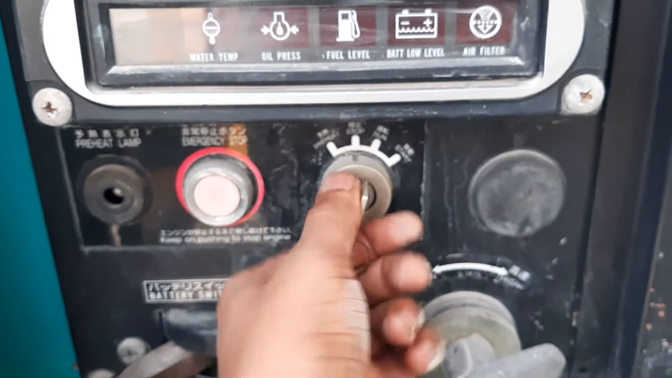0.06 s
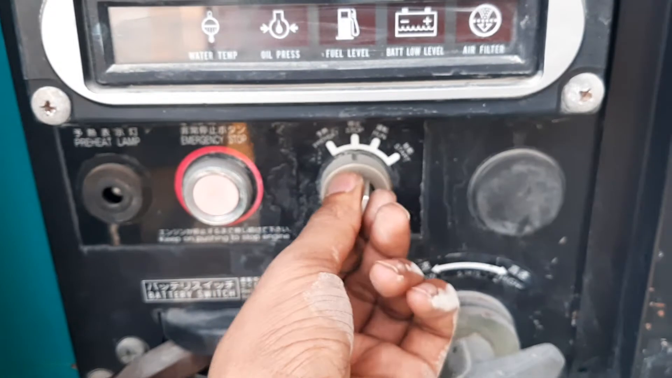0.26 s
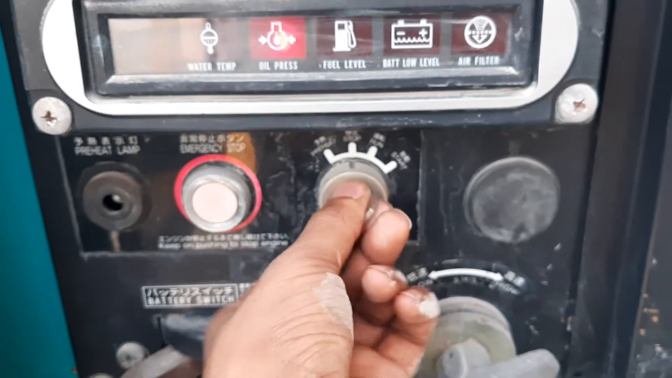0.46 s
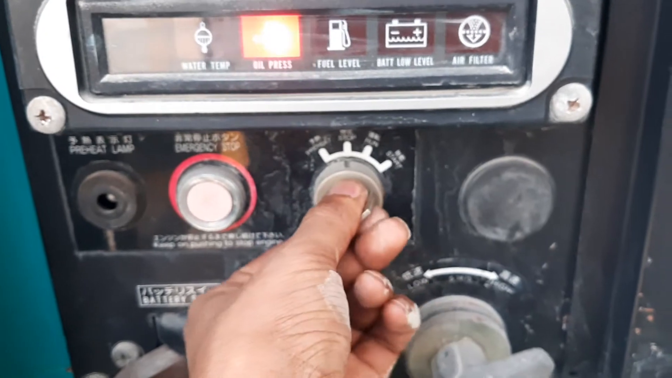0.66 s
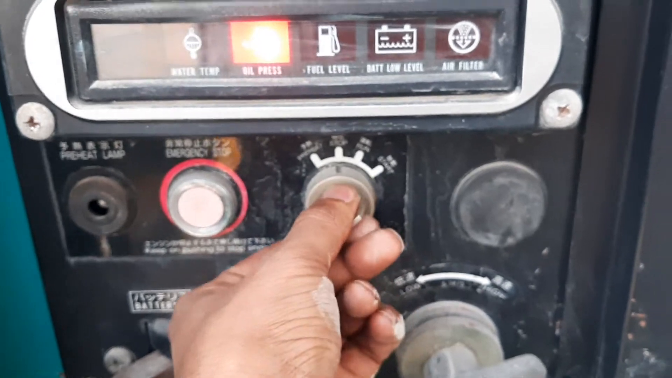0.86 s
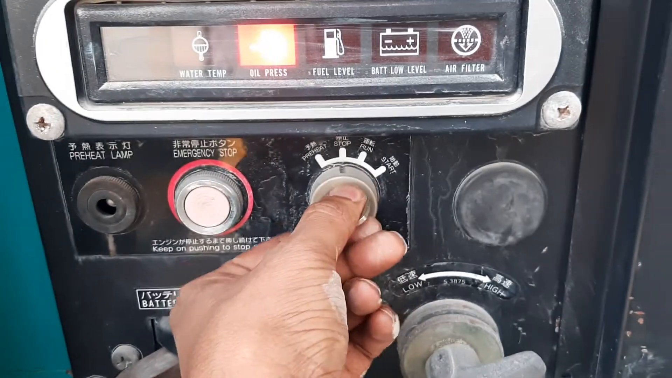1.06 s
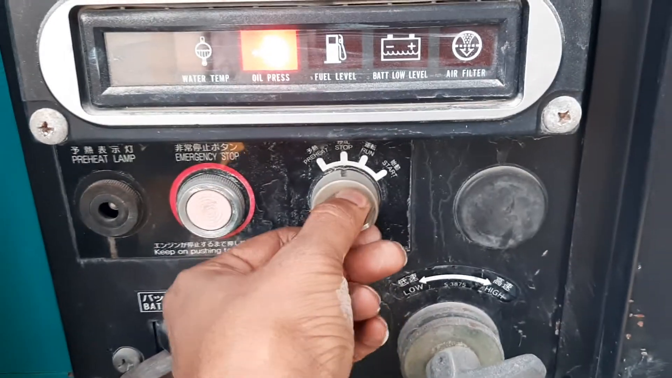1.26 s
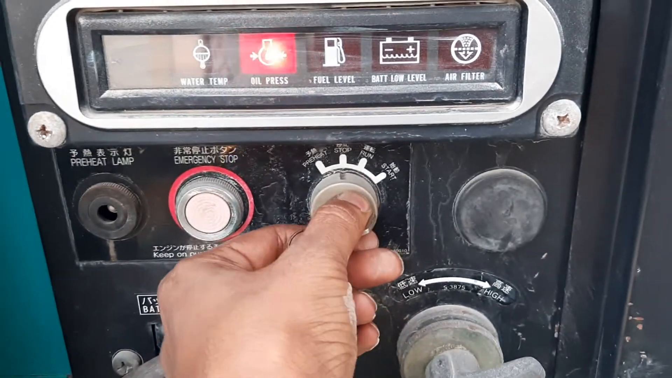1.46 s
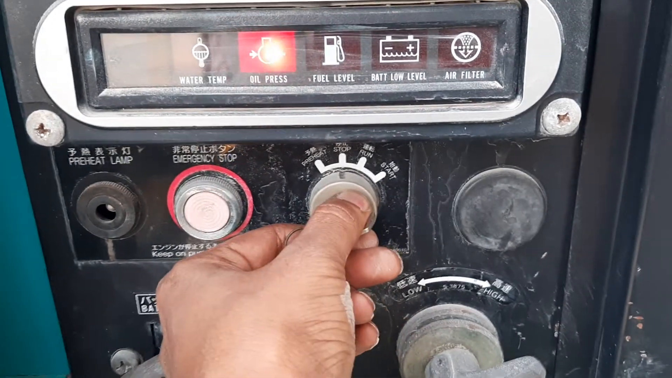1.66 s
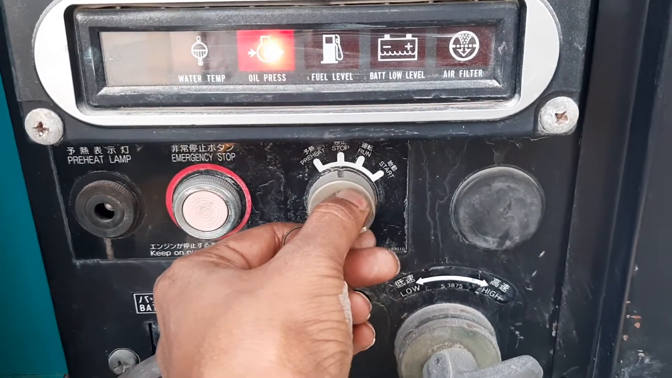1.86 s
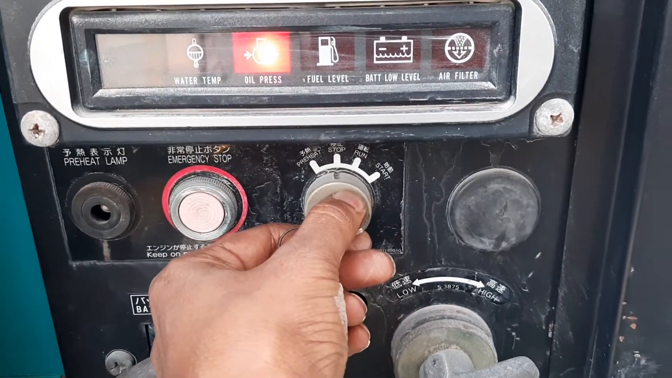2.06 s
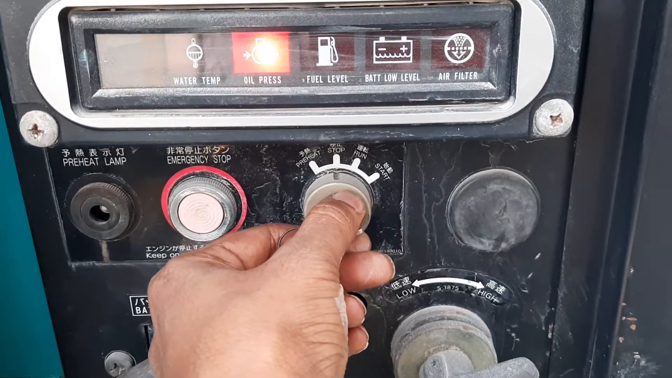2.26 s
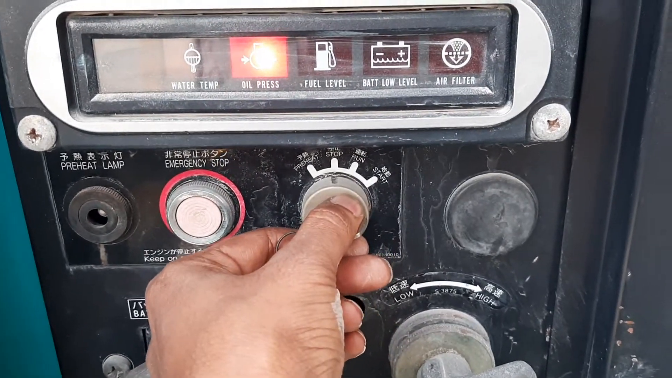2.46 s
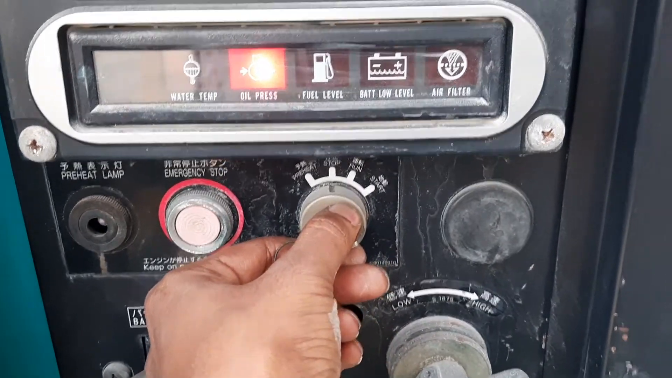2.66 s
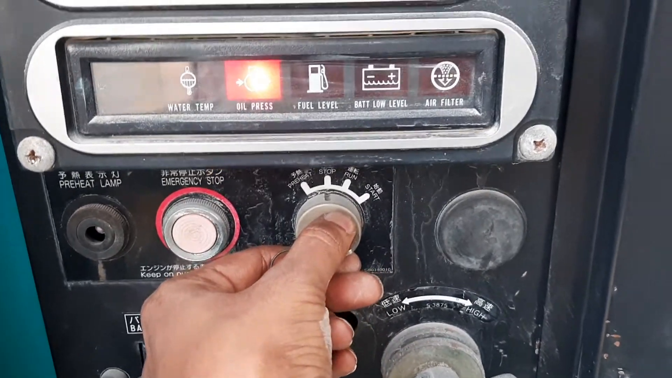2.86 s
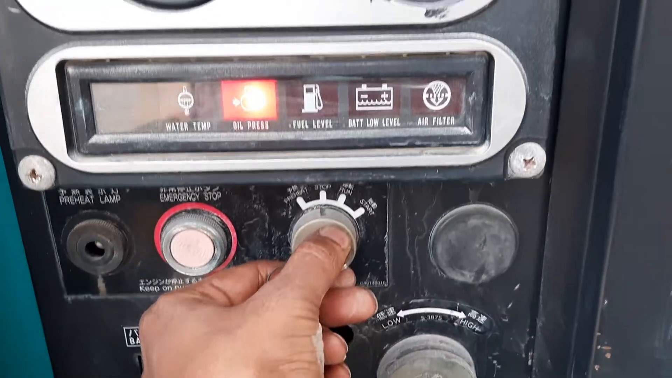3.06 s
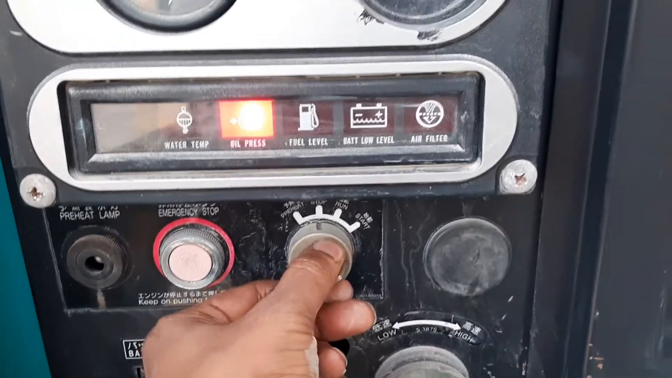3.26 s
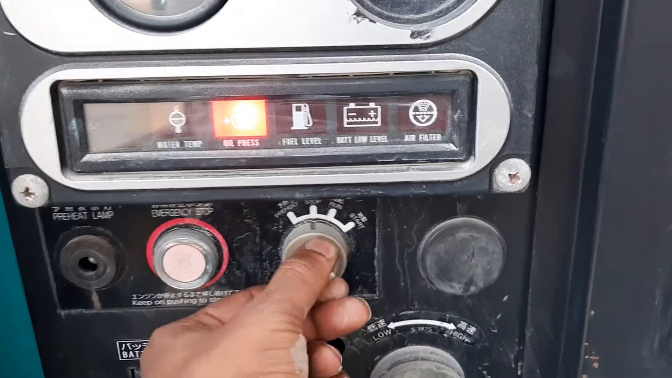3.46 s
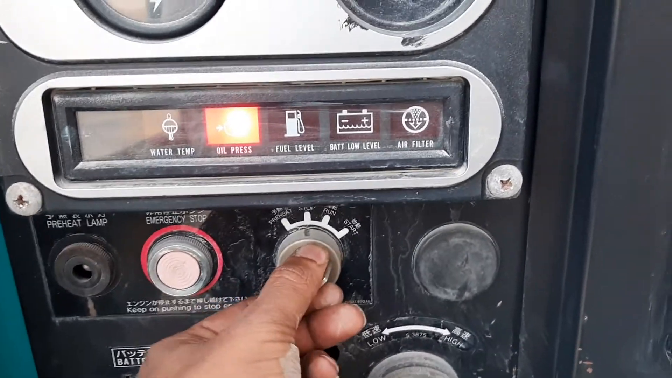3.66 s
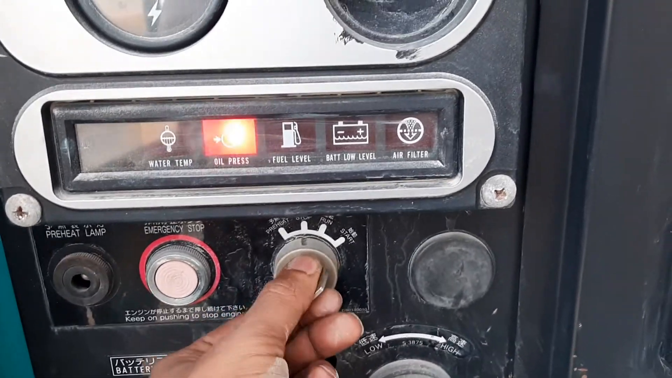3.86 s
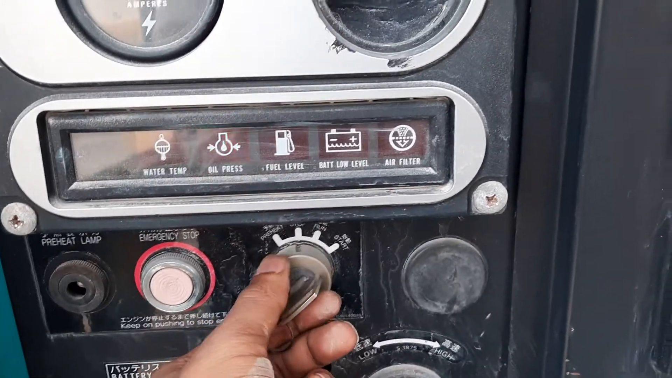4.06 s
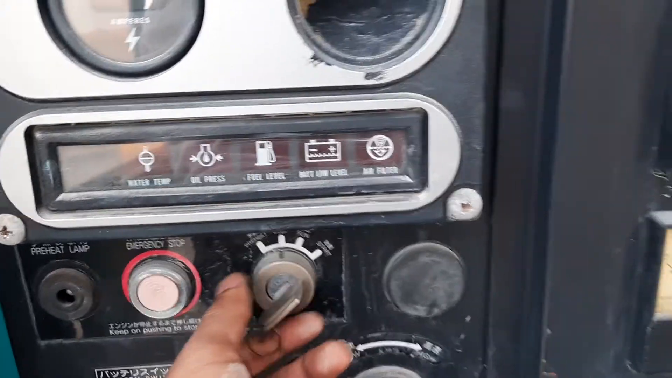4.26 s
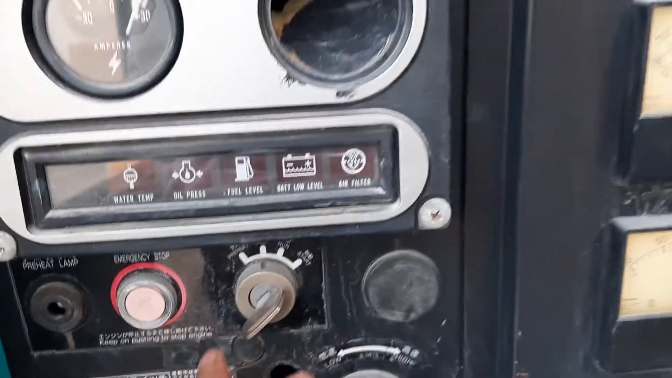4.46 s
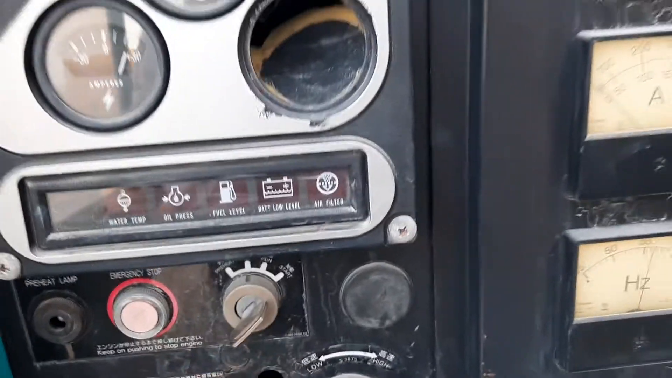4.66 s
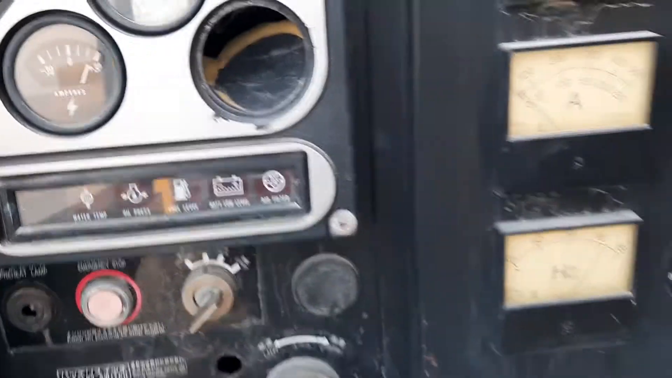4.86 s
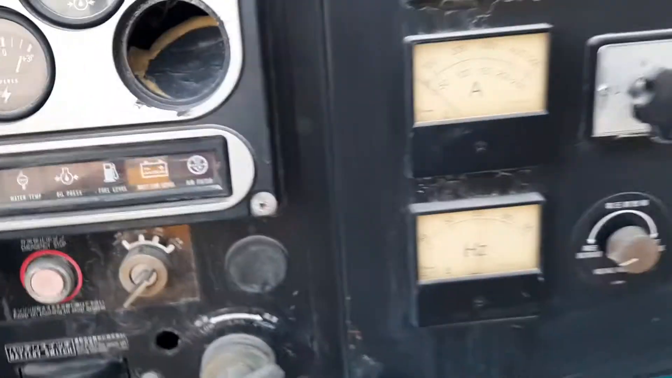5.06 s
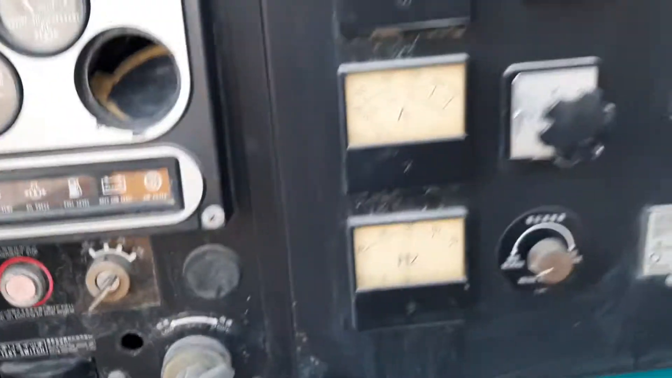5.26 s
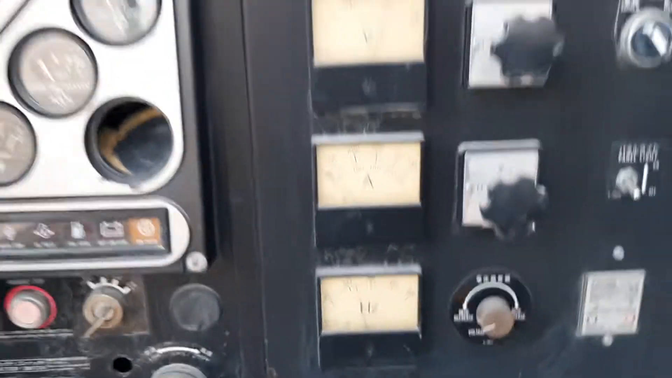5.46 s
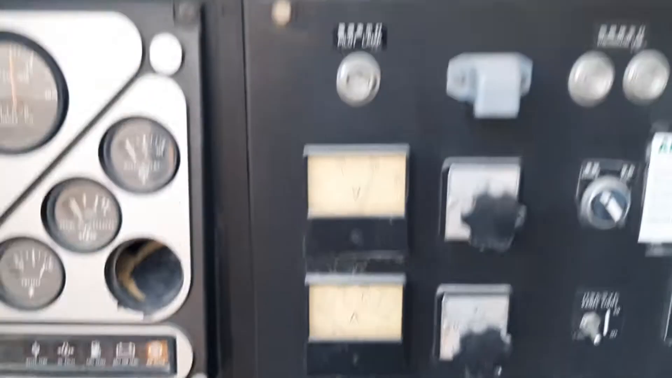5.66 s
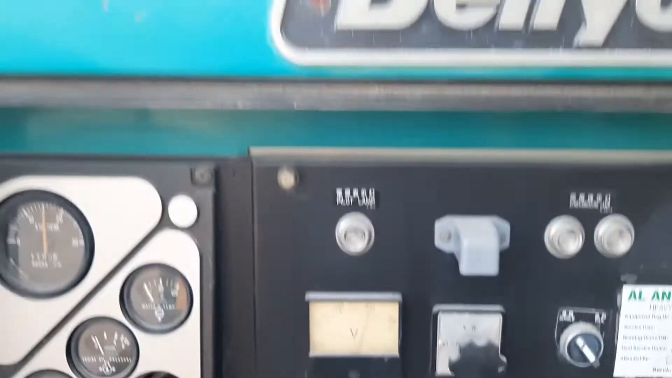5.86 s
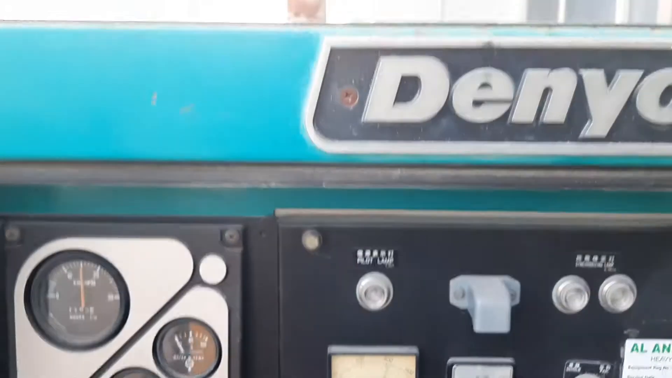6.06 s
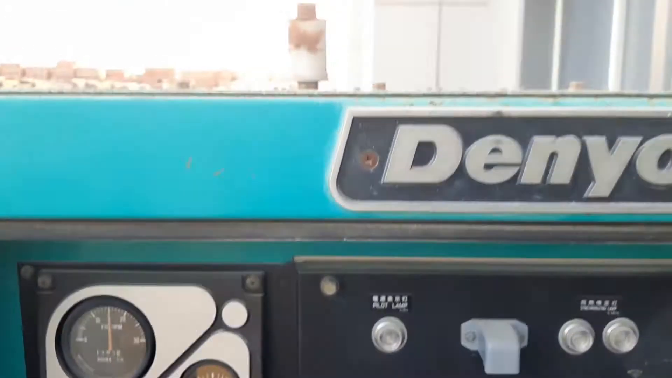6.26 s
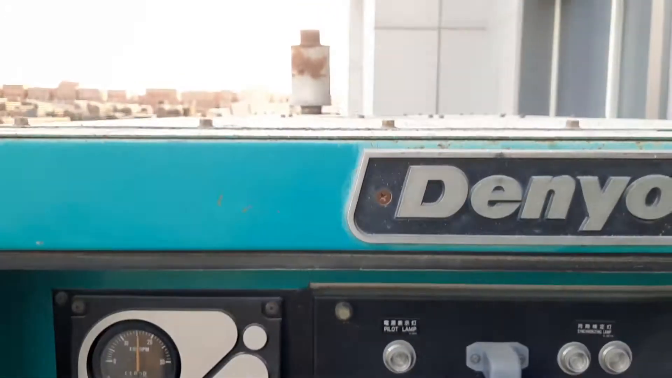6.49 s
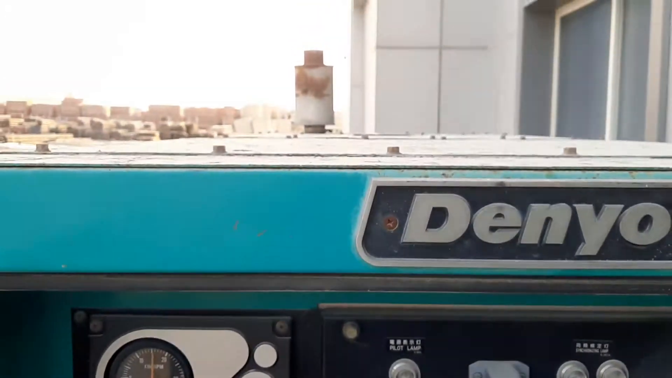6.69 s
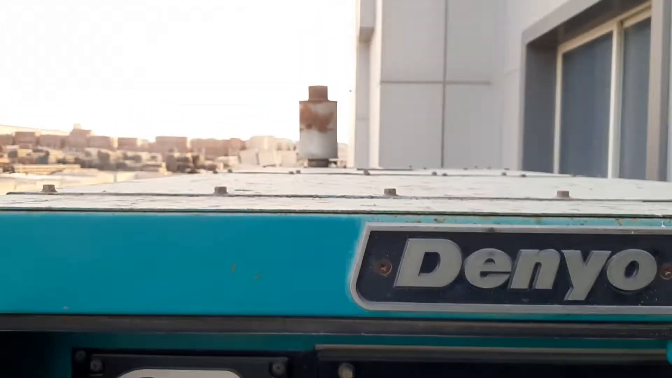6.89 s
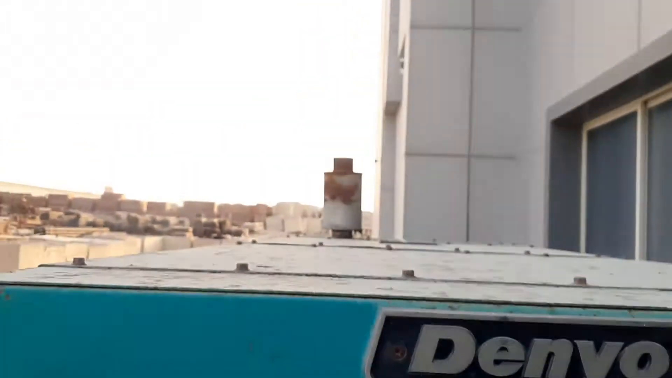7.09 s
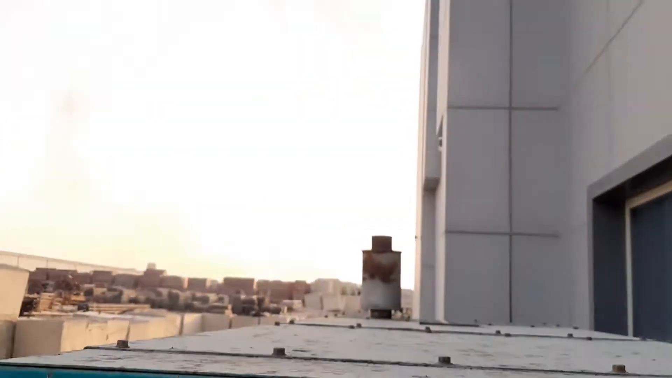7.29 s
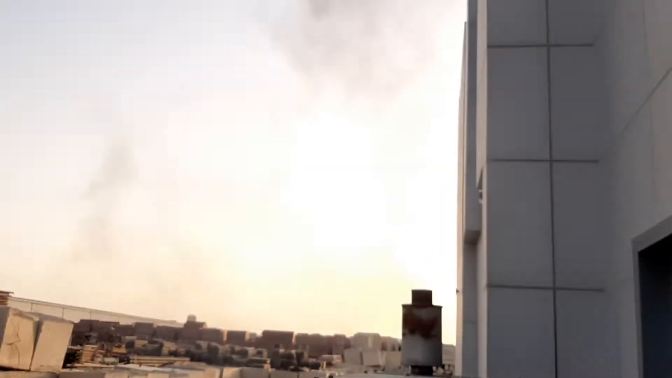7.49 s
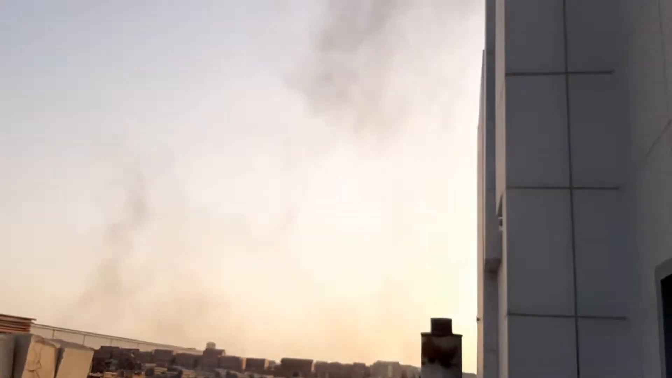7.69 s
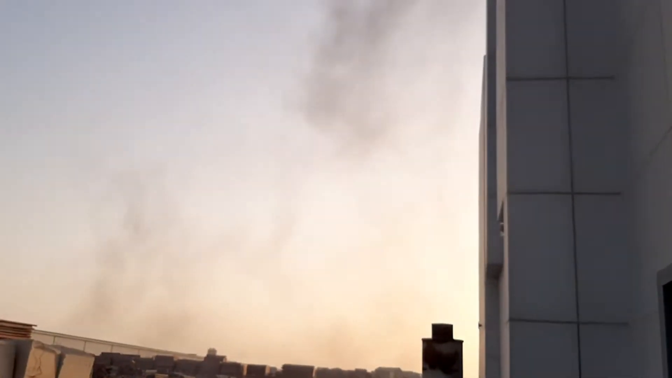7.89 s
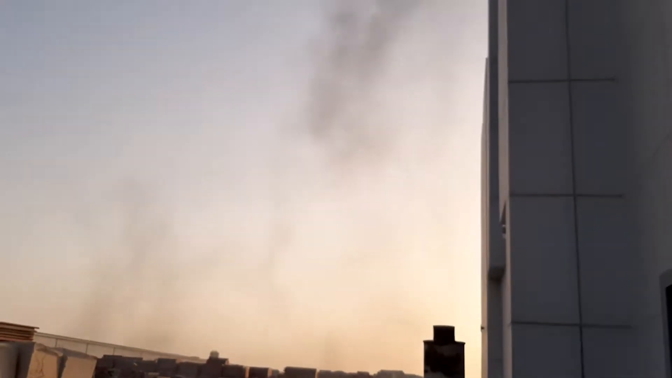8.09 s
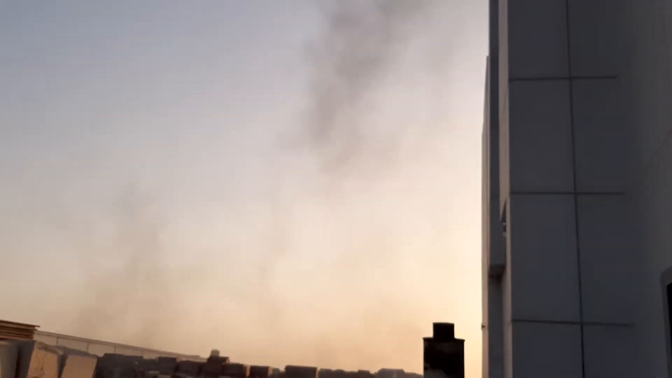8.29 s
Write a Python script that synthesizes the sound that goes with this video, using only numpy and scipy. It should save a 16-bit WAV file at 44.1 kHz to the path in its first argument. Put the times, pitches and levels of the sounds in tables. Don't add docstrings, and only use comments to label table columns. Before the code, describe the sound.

A quiet open yard murmurs under faint microphone hiss. Light touches on a key at 0.1 and 0.2 s lead to a scrape and quick clicks around 0.5 s, with a sharp snap and dull relay thud at 0.54. A soft stir of air fades. At about 1.45 s the starter slams in with hard metallic blows and a low jolt, then whines roughly around 750 to 870 Hz, surging higher near 1.95 and 2.12 s, with short squeals. The diesel catches unevenly; from 2.4, and thickest at 2.7 to 3.0 s, loose panels rattle brightly. From 3.1 to 4.2 s it climbs, clatter hardening and exhaust booming, then holds steady with a deep hum, fan drone, hiss and sparse trim ticks. From 4.5 to 5.6 s the microphone rises over the roof: panel fan and boom ease, exhaust tone and a loose tappet emerge, continuing steadily to the end at about 8.4 s.

```python
import sys
import numpy as np
from scipy import signal
from scipy.fft import rfft, irfft, next_fast_len
from scipy.io import wavfile
from scipy.ndimage import uniform_filter1d

SR = 44100
rng = np.random.default_rng(int(sys.argv[2]) if len(sys.argv) > 2 else 0)


def to_wav(sig):
    pcm = np.clip(np.atleast_2d(sig), -1, 1) * 32767
    pcm = np.round(pcm).astype(np.int16)
    wavfile.write(sys.argv[1], SR, pcm.T)


def ratio(d):
    e = np.asarray(d, float) / 20
    return 10 ** e


N = 367353
T = np.arange(N) / SR
HZ = np.fft.rfftfreq(next_fast_len(N), 1 / SR)


def evened(x):
    return x / np.sqrt(np.mean(x ** 2) + 1e-20)


def read(points):
    hz, value = np.transpose(points)
    return np.interp(np.log(HZ + 1), np.log(hz + 1), value)


def shaped(x, gain):
    size = next_fast_len(N)
    return irfft(rfft(x, size) * gain, size)[..., :N]


def noise(colour):
    return evened(shaped(rng.standard_normal((2, N)), ratio(read(colour))))


def level(rows, before_db=-120):
    return ratio(np.interp(T, *np.transpose(rows), left=before_db))


def wobble(rate_hz, size=N):
    steps = 2 * (size // 64 + 2)
    hz = np.fft.rfftfreq(steps, 32 / SR)
    slow = irfft(rfft(rng.standard_normal(steps)) / (1 + (hz / rate_hz) ** 4))
    return np.interp(np.arange(size) / 32, np.arange(steps), evened(slow))


def bursts(rows):
    power = np.zeros(N + SR)
    u = T[:SR // 2]
    rise = np.minimum(u / 0.0021, 1)
    for start_s, db, t60 in rows:
        power[round(start_s * SR):][:len(u)] += ratio(db - 60 * u / t60) ** 2 * rise
    return np.sqrt(power[:N])


def held(rows):
    t = T[::32]
    power = 0
    for start, end, db, rise, fall in rows:
        outside = np.maximum((start - t) / rise, (t - end) / fall)
        power = power + ratio(db - 60 * np.maximum(outside, 0)) ** 2
    return np.interp(T, t, np.sqrt(power))


def fuzzy(turn, blur_hz, depth_db, slip_rad):
    size = len(turn)
    sides = []
    for _ in "LR":
        swell = ratio(depth_db * wobble(blur_hz, size))
        sides.append(swell * np.sin(turn + slip_rad * wobble(blur_hz, size)))
    return np.array(sides)


def struck_modes(start_s, db, modes, rise_s=1e-4):
    u = T[:SR // 2]
    ring = sum(ratio(db + d - 60 * u / t60) * np.sin(2 * np.pi * hz * u) for hz, d, t60 in modes)
    return np.pad(ring * np.minimum(u / rise_s, 1), (round(start_s * SR), N))[:N]


# pitch_hz, level_db (per Hz)
YARD_COLOUR = [(18, -32), (30, -5), (79, -5.5), (115, -4.5), (175, -1), (253, -12.5), (603, -26),
               (670, -26.5), (895, -29.5), (1600, -34.5), (2780, -55.5), (9570, -67), (15000, -56.5),
               (16200, -61)]
# start_s, end_s, level_db, rise_s, fall_s
YARD_SWELLS = [
    (0.059, 1.43, -46, .1, .1),
    (0.0, .04, -44.5, .1, .3),
    (0.59, 0.61, -28.5, 0.27, 0.56),
    (0.56, 1.02, -45.5, 2, .3),
]
# pitch_hz, level_db (per Hz)
MICROPHONE_HISS = [(7000, -29), (10000, -14), (12500, -2), (15500, 0), (16300, -24.5)]


def yard():
    murmur = noise(YARD_COLOUR) * held(YARD_SWELLS) * ratio(1.2 * wobble(8.2))
    return murmur + ratio(-81) * noise(MICROPHONE_HISS)


# start_s, end_s, level_db, rise_s, fall_s
SCRAPES = [
    (.48, .648, -44.5, .012, 0.034),
    (.558, .564, -27.5, 0.12, 0.15),
    (.65, .66, -61.5, .05, .3),
]
# time_s, peak_db, t60_s, top_db (the thin top above 8 kHz)
KEY_CLICKS = [
    (0.0981, -49, 0.1, -21),
    (0.1879, -57.5, 0.16, -27),
    (0.476, -38, 0.1, -30),
    (0.4913, -38.5, .1, 2),
    (0.5027, -29, 0.1, 5.5),
    (0.5193, -22.5, 0.11, 6),
    (0.5387, -10.5, 0.081, -17),
    (.56, -26.5, .2, -3.5),
    (0.5994, -33, 0.1, -13.5),
]
# pitch_hz, level_db (per Hz)
BARREL_COLOUR = [(240, -35.5), (400, -8), (432, -8.5), (554, -16), (721, -3.5), (967, -16), (1520, -9.5),
                 (2300, -11.5), (2530, -12.5), (4340, -13), (7400, -18), (9000, -28), (11800, -23),
                 (13900, -29), (16200, -33)]
# pitch_hz, level_db (per Hz)
CLICK_TOP_COLOUR = [(3530, -39), (6000, -8), (8530, -22), (9240, -14), (9970, -24), (10400, -12),
                    (13900, -2), (16500, -22)]
# pitch_hz, level_db, t60_s
RELAY_THUD = (.541, -20.5, [(163.5, -3.5, 0.3), (197, -2.5, 0.17), (434, -21, .3), (657, -8, .19),
              (1620, -25, 0.35), (2430, -28, .16)])


def key():
    scrape = held(SCRAPES) * ratio(-1.5 + 1.5 * wobble(150))
    clicks = bursts([(s, db - 13.0, t60) for s, db, t60, _ in KEY_CLICKS])
    tops = bursts([(s, db + top_db - 7.0, 0.43 * t60) for s, db, t60, top_db in KEY_CLICKS])
    rasp = noise(BARREL_COLOUR) * np.hypot(scrape, clicks) + noise(CLICK_TOP_COLOUR) * tops
    thud = struck_modes(*RELAY_THUD) * ratio(2.5 * wobble(40))
    return rasp, thud


# time_s, peak_db, body_db (against treble), t60_s, top_db (against treble)
PANEL_BLOWS = [(1.4407, -12.5, 1.5, 0.38, 1), (1.4736, -8, -1.5, 0.15, -3), (1.496, -15.5, 1, 0.18, 1),
               (1.6258, -24.5, 10, 0.15, -0.5), (1.662, -15, 1, 0.2, -2.5), (1.9343, -26, 6, 0.15, 0),
               (2.1137, -24, -3, 0.1407, 0.5), (2.349, -22.5, 0.5, 0.13, -4),
               (2.4013, -13.5, -11, 0.095, 0.5), (2.45, -25, -3, .1, -4), (2.49, -24, 6, .1, -5),
               (2.5748, -19, -3, 0.1, -0.5), (2.672, -23, -3, .1, -3), (2.702, -9, -6, 0.094, 0.5),
               (2.7329, -11, -6.5, 0.1, -1.5), (2.745, -17.5, -6, .1, -4), (2.766, -9, -10.5, 0.1, -1),
               (2.775, -12, -8, .1, -3), (2.794, -13, -20, 0.082, 1.5), (2.8105, -13.5, -13, 0.14, -1),
               (2.833, -19, -3, .1, -3), (2.839, -11, -4.5, 0.12, 4), (2.855, -15.5, -8, .08, 0),
               (2.865, -8.5, -10, 0.12, -2.5), (2.884, -14.5, -6, .1, -2), (2.9088, -8, -8, 0.1, -4.5),
               (2.924, -9.5, -9, .12, -5), (2.957, -18, -6, .1, -2.5), (2.974, -8.5, -5, 0.06, -7),
               (3.1, -24.5, 6, .1, 0), (3.1363, -24.5, 5, 0.15, -4), (3.3069, -23, -5, 0.12, 1),
               (3.3498, -20.5, -10, 0.11, 0)]
# pitch_hz, level_db (per Hz)
SPRAY_COLOUR = [(1470, -9.5), (2500, -10), (3160, -1), (5640, -1), (7710, -3), (8080, -44), (8730, -16.5),
                (11700, -9.5), (13700, -11.5), (14900, -12), (16200, -37.5)]
# pitch_hz, width_hz, level_db
SHEET_METAL = [(830, 170, 7), (1940, 510, 6.5), (1520, 200, -16)]
# time_s, peak_db
TRIM_TICKS = [(3.4871, -40), (3.5395, -34.5), (3.6448, -36.5), (3.8982, -34), (4.0159, -32.5),
              (4.1801, -35), (4.2414, -38), (4.3133, -37), (4.5397, -36), (4.7308, -37), (4.875, -34.5),
              (5.3304, -36.5), (5.6597, -37.5), (5.9311, -38), (6.1386, -40), (6.5277, -38.5),
              (6.8455, -38), (7.0485, -39.5), (7.3693, -39), (7.6896, -41)]


def rattles():
    ring = sum(ratio(db) / (1 + (2 * (HZ - hz) / width) ** 2) for hz, width, db in SHEET_METAL)
    crackle = evened(ratio(1.6 * wobble(350)))
    spray = noise(SPRAY_COLOUR) * crackle
    top = shaped(spray, HZ > 7900)
    low = (spray - top) * bursts([(s, db - 9.5, t60) for s, db, _, t60, _ in PANEL_BLOWS])
    high = top * bursts([(s, db + up - 2.0, 0.5 * t60) for s, db, _, t60, up in PANEL_BLOWS])
    ticks = evened(top) * bursts([(s, db - 5, 0.1) for s, db in TRIM_TICKS])
    body = bursts([(s, db + body_db - 3.5, 0.53 * t60) for s, db, body_db, t60, _ in PANEL_BLOWS])
    return low + high + ticks + evened(shaped(rng.standard_normal((2, N)), ring)) * body


# start_s, end_s, pitch_hz,
# glide_hz_per_s, level_db
SQUEALS_AND_RINGS = [(1.655, 1.75, 12000, 0, -47), (1.76, 1.88, 12000, 0, -53), (3.52, 4.25, 13350, 0, -60),
                     (3.15, 3.7, 12000, 0, -59), (3.45, 3.7, 5100, 0, -53), (1.62, 1.88, 15000, 0, -55),
                     (2.88, 3.05, 15000, 0, -47), (2.9, 2.97, 11800, 0, -51), (3.4, 3.7, 4100, 0, -55),
                     (.6, 1.44, 1550, 0, -73), (.095, .12, 1650, 0, -61), (.18, .205, 1550, 0, -60),
                     (.62, .86, 5800, 0, -83), (.62, .82, 4300, 0, -86), (.16, .4, 4850, 0, -91),
                     (.477, .498, 1550, 0, -41.5), (.5, .514, 13600, 0, -43), (.518, .536, 14000, 0, -33),
               (.52, .534, 2400, 0, -39), (0.598, .67, 1560, 0, -49.5), (.59, .66, 2150, 0, -51.5),
               (.545, .62, 5600, 0, -53), (.545, .6, 3300, 0, -49), (1.564, 1.6, 1500, 2, -21),
               (1.651, 1.93, 727, 0, -25), (1.823, 1.9, 2170, 0, -32), (1.81, 1.895, 430, 0, -30),
               (1.59, 1.63, 1120, 0, -30), (1.935, 2.034, 630, 0, -31), (1.935, 2.02, 1525, -1, -27.5),
               (1.94, 2.03, 4580, -1500, -34), (1.95, 2.03, 4240, -1500, -32.5),
               (2.12, 2.153, 4400, 0, -40), (1.468, 1.496, 5600, -2, -25.5), (1.47, 1.495, 4400, 0, -26.5),
               (2.118, 2.148, 710, 0, -29), (1.6, 1.665, 1300, 0, -24), (1.625, 1.69, 2050, 0, -31.5),
               (1.7, 1.82, 4300, 0, -40), (2.04, 2.125, 3050, 5500, -39), (2.16, 2.265, 3600, 3800, -39),
               (2.175, 2.3, 1545, 300, -31), (2.258, 2.29, 2000, 0, -39), (3.16, 3.25, 4150, 0, -38),
               (3.23, 3.31, 4100, 0, -43), (3.05, 3.12, 4150, 0, -45), (2.972, 2.986, 5800, 0, -29),
               (1.69, 1.78, 2400, 0, -34), (1.98, 2.03, 1100, -1500, -26)]


def squeals():
    out = np.zeros((2, N))
    for start, end, hz, glide, db in SQUEALS_AND_RINGS:
        u = T[:round((end - start) * SR)]
        edge = np.sqrt(abs(np.sin(np.pi * (u / u[-1]) ** .7)))
        turn = 2 * np.pi * (hz * u + glide * u ** 2 / 2)
        out[:, round(start * SR):][:, :len(u)] += ratio(db) * edge * fuzzy(turn, 45, 4, 1.2)
    return out


# time_s, pitch_hz
TOOTH_SURGES = [
    [(1.53, 752.3), (1.58, 782), (1.62, 699.3), (1.69, 795.2), (1.745, 867.7), (1.79, 860.3),
     (1.825, 763.5), (1.93, 748)],
    [(1.932, 1199), (1.98, 1074), (2.01, 1003), (2.07, 977)],
    [(2.112, 1482), (2.126, 1277), (2.138, 1258), (2.148, 1353), (2.185, 1364)],
]
# start_s, end_s, level_db, upper_db (extra for high partials)
TOOTH_BITES = [
    (1.548, 1.59, -40, 9),
    (1.594, 1.66, -36, 6),
    (1.678, 1.783, -25.5, 2),
    (1.789, 1.871, -24.5, 3),
    (1.94, 2.015, -22.5, -3),
    (2.12, 2.135, -20, -6),
    (2.15, 2.155, -28, -31),
]
# multiple, level_db, slip_rad
WHINE_PARTIALS = [(.6, -16, 1.2), (.84, -12, 1.4), (.5, -13, .6), (1, 1, .65), (1.2, -17, 1.5),
                  (1.45, -13, 1.3), (1.7, -13, 1.5), (1.9, -11, 1.2), (2, 1, .6), (2.3, -12, 1),
                  (2.6, -13, 1), (3, -8.5, .55), (3.5, -17, 1), (4, -15, 1.1), (5, -16, 1.2)]


def starter():
    rise_s, fall_s, upper_fall_s = 0.087, 0.2, 0.12
    out = np.zeros((2, N))
    span = slice(round(TOOTH_SURGES[0][0][0] * SR), round(TOOTH_SURGES[-1][-1][0] * SR))
    t = T[span]
    hz = np.interp(t, *np.vstack(TOOTH_SURGES).T)
    low = held([(a, b, db, rise_s, fall_s) for a, b, db, _ in TOOTH_BITES])[span]
    upper = held([(a, b, db + up, rise_s, upper_fall_s) for a, b, db, up in TOOTH_BITES])[span]
    edge = 0
    for rows in TOOTH_SURGES:
        edge = edge + np.clip(np.minimum(t - rows[0][0], rows[-1][0] - t) / .008, 0, 1)
    turn = 2 * np.pi * np.cumsum(hz) / SR
    for k, order_db, slip in WHINE_PARTIALS:
        flutter = fuzzy(k * turn, 45 + 15 * k, 2.6, 1.15 * slip)
        out[:, span] += ratio(order_db) * (upper if k > 1.7 else low) * edge * flutter
    out[:, span] *= ratio(3.5 * np.sin(2 * np.pi * 46.9 * t + 1.53 * wobble(12, len(t))))
    return out


# time_s, firings_hz
ENGINE_SPEED = [(1.44, 6), (2.2, 20), (2.48, 33.5), (2.8, 41), (3.09, 34.5), (3.4, 45.9), (3.7, 58.3),
                (4, 69.9), (4.2, 75.9), (4.45, 75.13), (4.85, 75), (5.65, 75.01), (6.45, 75.1),
                (8.4, 75.17)]


def crank():
    firing = np.interp(T, *np.transpose(ENGINE_SPEED), left=1e-3)
    return firing, np.cumsum(firing) / SR / 6


# time_s, share (0-1)
PHONE_RAISED = [
    (4.5, 0),
    (5.6, 1),
]


def raised():
    return np.clip(np.interp(T, *np.transpose(PHONE_RAISED)), 0, 1)


# start_s, end_s, clatter_db, brightness_db
FRAME_STRAINS = [(1.454, 1.477, -32.5, 10.5), (1.491, 1.576, -19, -16.5), (1.577, 1.635, -21.5, -7.5),
                 (1.633, 1.827, -21, -5.5), (1.946, 1.998, -24.5, -2.5), (2.12, 2.127, -24, -3),
                 (2.403, 2.408, -26.5, -5), (2.445, 2.52, -34.5, 1), (2.574, 2.58, -31.5, 3),
                 (2.624, 2.7, -34, 4), (2.702, 2.942, -23, -1.5), (2.954, 3.106, -29.5, 1.5),
                 (3.357, 3.36, -28, -19)]
# start_s, end_s, level_db, ramp_s
FULL_FUEL = (3.41, 4.05, 3.44, 0.26)
# start_s, end_s, hiss_db, rise_s, fall_s
GEAR_IN_MESH = (1, 3.5, -33, 2.5, 6)


def efforts(firing):
    rise_s, fall_s, fizz_fall_s = 0.034, 0.31, 0.38
    speed_db = 20 * np.log10(np.maximum(firing, 1e-3) / 75)
    turning = T > ENGINE_SPEED[0][0]
    start, end, pull_db, ramp = FULL_FUEL
    pull = np.clip(np.minimum(T - start, end - T) / ramp + 1, 0, 1)
    strain = held([(a, b, db, rise_s, fall_s) for a, b, db, _ in FRAME_STRAINS])
    bright = held([(a, b, db + up, rise_s, fall_s) for a, b, db, up in FRAME_STRAINS])
    thin = held([(a, b, db + up - 10.5, rise_s, fizz_fall_s) for a, b, db, up in FRAME_STRAINS])
    clatter = np.hypot(strain, ratio(-24.5 + 0.65 * speed_db + pull_db * pull)) * turning
    hiss = np.sqrt(bright ** 2 + held([GEAR_IN_MESH]) ** 2 + ratio(-40) ** 2) * turning
    air_db = -44 - np.maximum(2.5 * (3.7 - T), 2 * (T - 3.7))
    fizz = np.hypot(thin, ratio(air_db)) * turning
    fan = ratio(3.3 * np.minimum(speed_db, 0))
    return clatter, hiss, fizz, fan


# multiple, level_db
FAN_TONES = [(1, 0), (2, -11), (3, -11.5), (4, -17), (5, -24), (9, -23)]
# start_s, end_s, level_db, rise_s, fall_s
FAN_SWELL = (3.92, 4.18, 1, .5, 2.2)


def cooling_fan(cycles, effort, far):
    blades = 6 * 1.7215 * 2 * np.pi * cycles
    base = np.hypot(effort * ratio(2.5 * (1 - far)), held([FAN_SWELL]))
    upper = effort ** .4
    out = 0
    for k, db in FAN_TONES:
        tone = np.sin(k * (blades + .12 * wobble(5)))
        out = out + (base if k == 1 else upper) * ratio(db + 1.3 * wobble(6)) * tone
    return out * ratio(-23.5)


# multiple, level_db
CYCLE_TONES = [(5, -23), (9, -12), (10, -14), (11, -23), (13, -18), (14, -14), (15, -16), (18, -17),
               (21, -16), (24, -7), (27, -19), (33, -21)]
# pitch_hz, width_hz, level_db
CABINET_AIR = (133, 20, 13)
# start_s, end_s, level_db, rise_s, fall_s
GOVERNOR_SWELL = (3.7, 4, -15, 2, 2)
GOVERNOR_TONES = (9, 10, 15, 18)


def cycle_tones(firing, cycles):
    gain = held([(3.7, T[-1], -26, 1.5, 1)])
    settling = np.hypot(gain, held([GOVERNOR_SWELL]))
    box_hz, box_width, box_db = CABINET_AIR
    out = 0
    for k, db in CYCLE_TONES:
        lift_db = box_db * (firing / 75) ** 3 / (1 + (2 * (k * firing / 6 - box_hz) / box_width) ** 2)
        tone = np.sin(2 * np.pi * (k * cycles + rng.random()))
        strength = settling if k in GOVERNOR_TONES else gain
        out = out + strength * ratio(db + lift_db + 1.9 * wobble(2.3)) * tone
    return out


# time_s, level_db
EXHAUST_PULSE = [(2.4, -45), (2.9, -32), (3.1, -41), (3.33, -36), (3.45, -32), (3.7, -23.5), (3.9, -18.5),
                 (4.05, -19), (4.2, -33), (4.7, -30), (5.3, -24), (8.4, -23)]
# time_s, level_db
EXHAUST_SECOND = [(3.6, -44), (3.85, -22.5), (4, -17.5), (4.2, -26), (4.4, -26), (4.6, -21), (4.9, -27.5),
                  (5.3, -26), (5.8, -29), (6.3, -44)]


def exhaust(cycles):
    turn = 2 * np.pi * cycles
    fired = ratio(.8 * wobble(3)) * np.sin(6 * turn)
    twice = ratio(1.5 * wobble(5)) * np.sin(12 * turn + 1) * (T < EXHAUST_SECOND[-1][0])
    return fired * level(EXHAUST_PULSE) + twice * level(EXHAUST_SECOND)


# pitch_hz, level_db (per Hz)
BOOM_AT_PANEL = [(21, -45), (42, -24), (60, -6.5), (102, -2.5), (129, 0.5), (160, 1), (208, -5),
                 (271, -5.5), (356, -14), (415, -17.5), (600, -20.5), (780, -60), (1320, -120)]
# pitch_hz, level_db (per Hz)
BOOM_OVER_ROOF = [(21, -40), (42, -18), (64, -6.5), (129, -3.5), (146, -2.5), (203, -7), (291, -1.5),
                  (391, -10.5), (473, -13), (600, -16.5), (780, -42), (1320, -120)]
# time_s, level_db
BLOCK_ROCKING = [(1.47, -40), (1.5, -27), (1.547, -16.5), (1.66, -16.5), (1.82, -26), (2.19, -27),
                 (2.39, -20), (2.48, -15), (2.56, -21.5), (2.6, -15), (2.93, -13), (3.02, -17),
                 (3.4, -20.5), (3.55, -21.5), (4.05, -17.5), (4.3, -17.5), (4.6, -21.5), (8.4, -23)]


def boom(far):
    rumble = np.sqrt(1 - far) * noise(BOOM_AT_PANEL) + np.sqrt(far) * noise(BOOM_OVER_ROOF)
    return rumble * ratio(1.16 * wobble(21)) * level(BLOCK_ROCKING)


# pitch_hz, level_db (per Hz)
HISS_COLOUR = [(1410, -6), (2400, -1.5), (3270, -8), (5280, -9), (7900, -19.5), (10300, -80), (17400, -120)]
# pitch_hz, level_db (per Hz)
FIZZ_COLOUR = [(4650, -3), (7900, 0.5), (10100, -3), (11600, 1), (13000, 0.5), (15100, -9), (15600, -4),
               (16200, -25)]


def air_hiss(train, hiss_gain, fizz_gain):
    beat = uniform_filter1d(abs(train), size=300)
    swell = evened(1 + 0.5 * beat / beat.mean()) * ratio(1.15 * wobble(25))
    fizz = noise(FIZZ_COLOUR) * fizz_gain * ratio(1.6 * wobble(29))
    return swell * (noise(HISS_COLOUR) * hiss_gain + fizz)


# pitch_hz, spread_db (of force), level_db (against clatter), fall_db (per cycle)
LOOSE_TAPPET = (1160, 1.5, -4.5, 20)


def tappet(cycles):
    hz, spread_db, db, fall_db = LOOSE_TAPPET
    since = cycles - .74 + 1
    force = ratio(spread_db * rng.standard_normal(int(since[-1]) + 2))[since.astype(int)]
    ring = fuzzy(2 * np.pi * hz * T, 40, 2, .9)
    return ring * uniform_filter1d(force * ratio(db - fall_db * (since % 1)), size=200)


def knocks(cycles, count, spread_db, vary):
    angle = (np.arange(count) + rng.random(count)) / count
    size = ratio(spread_db * rng.standard_normal(count)) * rng.choice([-1, 1], count)
    due = (np.arange(int(cycles[-1]) + 1)[:, None] + angle).ravel()
    at = np.interp(due, cycles, np.arange(N)).round().astype(int)
    force = np.tile(size, len(due) // count) * (1 + vary * rng.standard_normal(len(due)))
    return np.bincount(at, force, N)


def cabinet(x, t60, turns):
    t = np.arange(round(t60 * SR)) / SR
    paths = rfft(rng.standard_normal((2, 2, len(t))) * ratio(-60 * t / t60), next_fast_len(N))
    heard = shaped(x, paths / (abs(paths) + 1e-9))
    angle = 2 * np.pi * turns * T / T[-1]
    mixed = np.cos(angle) * heard[0] + np.sin(angle) * heard[1]
    overlap = np.mean(heard[0] * heard[1], axis=1) / np.mean(heard ** 2, axis=(0, 2))
    return mixed / np.sqrt(1 + overlap[:, None] * np.sin(2 * angle))


# pitch_hz, level_db (per Hz)
CLATTER_COLOUR = [(210, -26.5), (350, 0), (482, -9), (519, -7.5), (965, -8), (1130, -8), (1250, -7),
                  (1570, -7.5), (3300, -26), (4290, -29.5), (7260, -120)]
# pitch_hz, share (0-1)
REPEATING_SHARE = [(350, 0.43), (700, 0.78), (1200, 0.86), (1900, 0.61), (2700, 0.4), (3400, 0.09)]
# pitch_hz, width_hz, panel_db, roof_db
BLOCK_RINGS = [(600, 80, 0, 5), (735, 50, 4, 1), (900, 40, 5, 4), (1045, 70, 8, 3), (1160, 80, -2, 5),
               (1300, 90, -3, -4), (1500, 200, 3, 3), (1740, 120, 3, 3), (1870, 120, -3, -3),
               (2070, 220, 4, 4.5)]


def clatter(train, firing, far):
    struck = shaped(cabinet(train, .07, turns=2.592), ratio(read(CLATTER_COLOUR)))
    struck = evened(struck / np.sqrt(firing + 1))
    share = np.clip(read(REPEATING_SHARE), 0, 1)
    mixed = shaped(struck, np.sqrt(share)) + shaped(noise(CLATTER_COLOUR), np.sqrt(1 - share))
    panel_db = roof_db = 0
    for hz, width, panel, roof in BLOCK_RINGS:
        peak = 1 / (1 + (2 * (HZ - hz) / width) ** 2)
        panel_db, roof_db = panel_db + panel * peak, roof_db + roof * peak
    return evened((1 - far) * shaped(mixed, ratio(panel_db)) + far * shaped(mixed, ratio(roof_db)))


# pitch_hz, level_db, t60_s
STARTER_KICK = (1.497, -12, [(98.2, -1, .7), (120, -1, .6), (150, -6.5, 0.63), (434, -3, .2)])


def engine():
    (firing, cycles), far = crank(), raised()
    clatter_gain, hiss_gain, fizz_gain, fan_gain = efforts(firing)
    train = knocks(cycles, count=90, spread_db=3.5, vary=0.44)
    block = boom(far) + air_hiss(train, hiss_gain, fizz_gain)
    block += (clatter(train, firing, far) + far * tappet(cycles)) * clatter_gain
    tones = exhaust(cycles) + cycle_tones(firing, cycles) + cooling_fan(cycles, fan_gain, far)
    return block, np.sqrt(2) * tones + struck_modes(*STARTER_KICK, rise_s=0.013)


# pitch_hz, likeness (-1 to 1)
SIDE_LIKENESS = [(60, 0.85), (170, 1), (345, 0.86), (520, 0.33), (800, 0.38), (1100, 0.13), (1400, -0.29),
                 (1900, 0.13), (16000, -0.065)]
# pitch_hz, level_db
SIDE_LEAN = [(60, -6), (120, -5), (240, -2.5), (480, -3.0), (950, -4.5), (1890, -4.5), (3770, -7.5),
             (7000, -8), (9500, 4), (14000, -6.5)]


def scene():
    (rasp, thud), (block, tones) = key(), engine()
    a, b = yard() + rasp + block + starter() + squeals() + rattles()
    whole = tones + thud
    same, lean = np.clip(read(SIDE_LIKENESS), -1, 1), ratio(read(SIDE_LEAN) / 2)
    left = shaped(a + whole, lean)
    right = shaped(a, same / lean) + shaped(b, np.sqrt(1 - same ** 2) / lean) + shaped(whole, 1 / lean)
    return np.array([left, right])


def band_limit(x):
    return signal.sosfilt(signal.butter(12, 15850, fs=SR, output="sos"), x)


def record(dry):
    cut = shaped(dry, 1 / np.sqrt(1 + (36 / (HZ + 1)) ** 6))
    return band_limit(1.572 * np.tanh(cut / 1.62))


dry = scene()
out = record(dry)
to_wav(out)
```